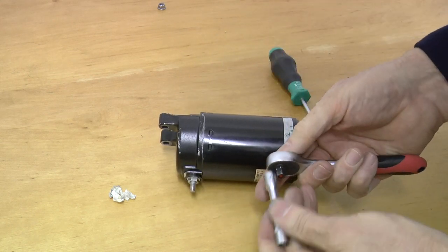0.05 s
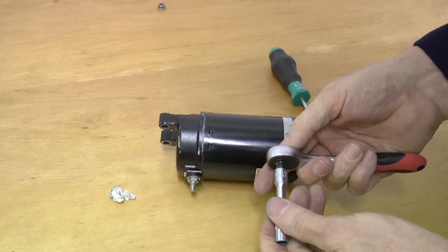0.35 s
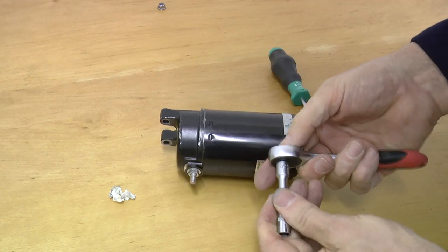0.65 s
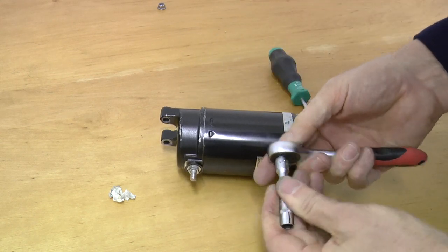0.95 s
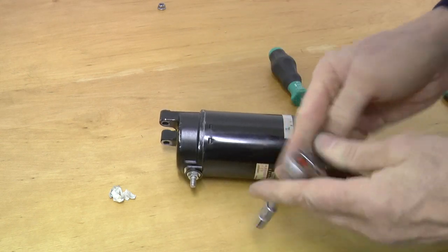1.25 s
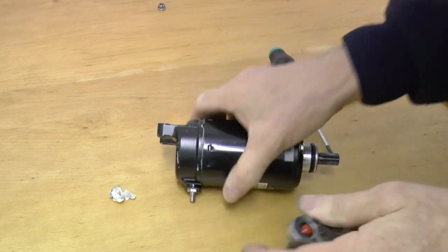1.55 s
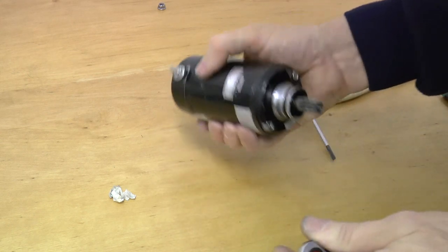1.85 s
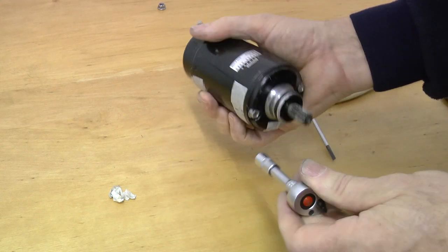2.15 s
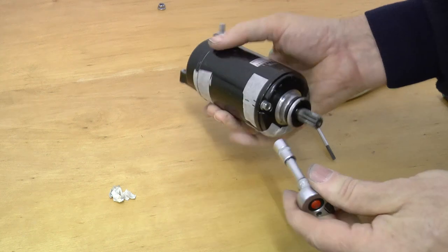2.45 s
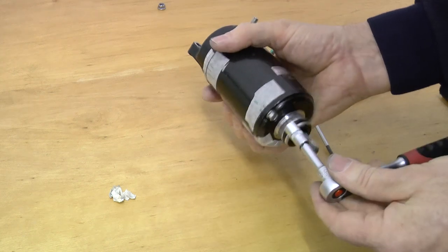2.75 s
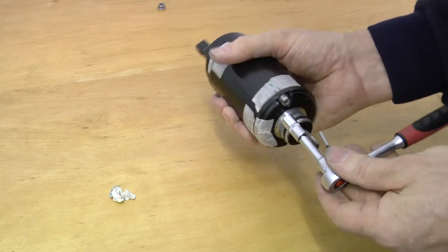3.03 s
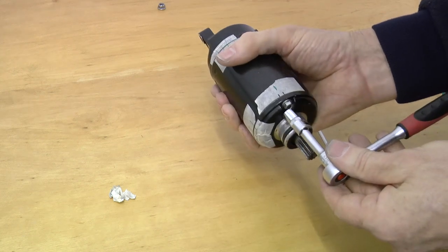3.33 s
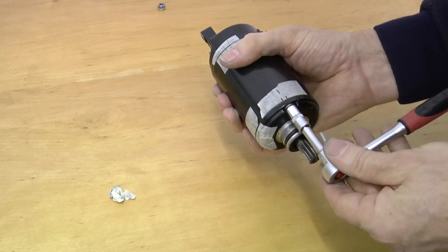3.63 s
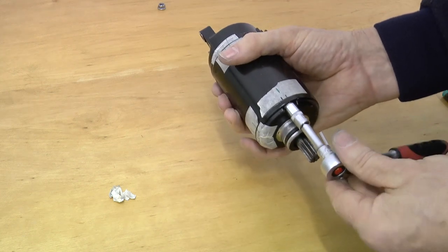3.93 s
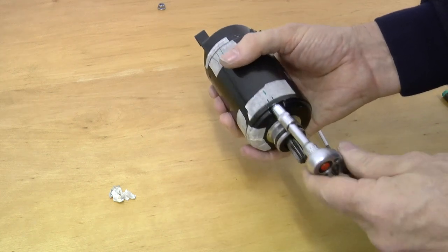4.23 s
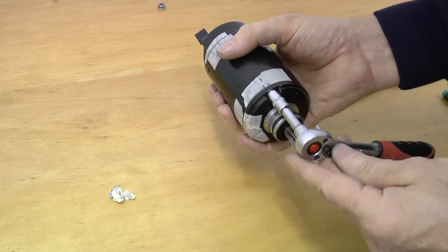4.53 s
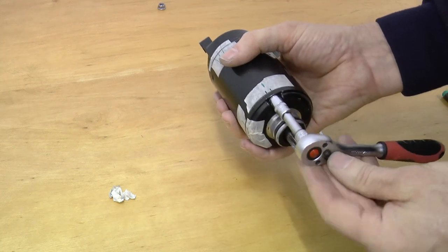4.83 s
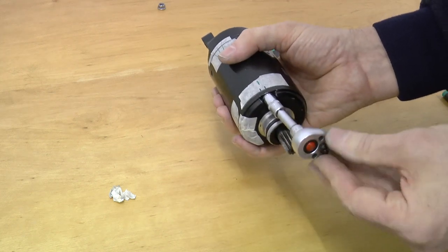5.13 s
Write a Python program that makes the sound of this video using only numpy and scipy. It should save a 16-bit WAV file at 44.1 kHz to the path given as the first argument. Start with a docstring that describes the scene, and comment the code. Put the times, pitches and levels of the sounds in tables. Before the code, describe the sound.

A steel socket is pushed onto a small ratchet with a scatter of sharp, hand-damped clicks. Fingers rub faintly over metal, and a heavy motor rocks on a wooden bench in a quick cluster of dull thuds. The socket taps onto a bolt, then the ratchet ticks through two short back-swings. Everything is close and nearly centred, in a small, slightly live workshop with soft air and a faint electrical whine.

```python
"""A steel socket is pushed onto a small ratchet and set on a bolt of a starter motor; the pawl then
clicks through two short back-swings. Each contact is a tiny crack with a hand-damped ring.
Before the socket meets the bolt, the motor is lifted and rocks on the wooden bench with dull thuds.
Fingers rub over the metal. Close and almost centred, in a small live workshop
with soft air and a faint electrical whine."""
import sys
import numpy as np
from scipy import signal
from scipy.fft import rfft, irfft
from scipy.io import wavfile
from scipy.ndimage import uniform_filter1d

SR = 44100
rng = np.random.default_rng(int(sys.argv[2]) if len(sys.argv) > 2 else 0)


def store_pcm(level_fs):
    """Save levels as 16-bit WAV."""
    pcm = np.round(np.clip(level_fs, -1, 1) * 32767).astype(np.int16)
    wavfile.write(sys.argv[1], SR, np.atleast_2d(pcm).T)


N = 232829
TIME = np.arange(N) / SR

# edges of the four bands that colour a steel crack: f/Hz
CRACK_BAND_EDGES = [1500, 2500, 5500, 10000, 16500]
# steel parts knocking together: t/s, then relative level/dB in each crack band, low to high
SOCKET_KNOCKS = [(0.0163, -43, -30.5, -29.5, -51), (0.0625, -44.5, -58, -45, -54),
                 (0.2359, -44.5, -35.5, -43.5, -57), (0.2762, -70, -59, -68, -78),
                 (0.295, -52, -60, -68, -76), (0.3105, -51.5, -60, -69, -81), (0.366, -61, -50, -72, -88),
                 (0.3712, -46, -48, -62, -74), (0.3782, -51, -38, -55, -47),
                 (0.3804, -49, -40.5, -38.5, -42.5), (0.6662, -47, -51, -45.5, -46),
                 (0.6726, -49, -33, -42, -43), (0.6752, -44, -32, -30.5, -28.5),
                 (0.6785, -31, -34, -29, -33), (0.6795, -42.5, -38, -31, -35),
                 (0.9538, -71, -51.5, -60, -79), (0.9928, -62, -60, -63, -69), (1.2205, -62, -49, -52, -71),
                 (1.3093, -61, -51, -62.5, -70), (1.3185, -58.5, -66, -61, -75),
                 (1.6935, -58, -47.5, -53.5, -72), (2.021, -64, -63, -66, -81), (2.163, -71, -58, -64, -80),
                 (3.2208, -50, -38.5, -46, -63), (3.3148, -57, -58.5, -76, -80),
                 (3.3292, -69, -71, -77, -80), (3.5413, -49, -47.5, -66, -75), (3.552, -63, -62, -68, -85),
                 (3.5662, -60, -41, -45, -65), (3.5765, -48, -50, -57, -74), (3.5855, -64, -56, -59, -65),
                 (4.4955, -65, -68, -85, -93), (4.5405, -70, -63.5, -79, -94),
                 (4.6172, -80, -63.5, -79, -91)]
# hand-damped ring of socket and extension: f/Hz, width/Hz, lift/dB
SOCKET_RING = [(2020, 222, 9), (2660, 34, 3.5), (3100, 260, 2.5), (4396, 86, 8.5), (5710, 106, -2.5),
               (7340, 176, 10), (8120, 49.3, 8.5), (9200, 55, -7), (10500, 67, 6), (12400, 89, 2)]
# the pawl dropping off a tooth: t/s, then relative level/dB in each crack band, low to high
PAWL_CLICKS = [(3.84, -47, -40.5, -31.5, -40), (3.8702, -67, -39, -32, -37), (3.8885, -54.5, -45, -37, -42),
               (3.9066, -55, -38.5, -33.5, -38), (3.9372, -48, -40.5, -35.5, -44),
               (4.0884, -51.5, -39, -33.5, -41), (4.1234, -66, -45, -33.5, -42),
               (4.1452, -49, -41.5, -29.5, -41), (4.1478, -51, -53.5, -35.5, -42),
               (4.1874, -50, -36, -34, -40.5)]
# ring of the ratchet head: f/Hz, width/Hz, lift/dB
RATCHET_RING = [(1990, 86, 17.5), (2890, 300, -3.5), (4964, 107, 11.5), (5690, 110, 4), (6100, 48, 1),
                (6440, 94, 5.5), (7510, 74, 16), (7900, 40, 8), (9040, 50, 6), (9980, 55, 2),
                (11320, 130, 8)]
# the motor rocking on the bench: t/s, relative level/dB, contact time/ms
MOTOR_BUMPS = [(1.5797, -39.5, 0.44), (1.588, -50, 3.5), (1.5988, -36.5, 1.36), (1.6107, -29.5, 0.71),
               (1.6236, -26, 1.26), (1.6324, -26, 2.76), (1.6383, -41.5, 0.67), (1.671, -47, 1.1),
               (1.689, -43, 0.73)]
# ring of bench top and motor housing: f/Hz, relative level/dB, t60/s
BENCH_RING = [(140.2, -10.5, 0.23), (178.8, -9.5, 0.38), (200.5, -12.5, 0.51), (279.6, -0.5, 0.079),
              (342.3, -8, 0.3), (396.5, -3, 0.16), (528, -18, 0.23), (581, -7.5, 0.15), (717, -8, 0.06),
              (770, -13, 0.096), (1149, -8.5, 0.032), (2960, 2.5, 0.042)]
# fingers sliding over metal, one envelope per gesture: t/s, relative level/dB
RUB_ENVELOPES = [
    [(1.05, -82), (1.1, -83), (1.14, -72.5), (1.2, -77), (1.22, -63), (1.24, -70), (1.29, -74), (1.32, -65),
     (1.43, -72.5), (1.62, -59), (1.68, -75), (1.7, -67), (1.73, -66.5), (1.86, -74), (1.99, -75),
     (2.03, -72.5), (2.12, -78), (2.16, -72.5), (2.31, -83.5), (2.38, -67.5), (2.44, -89), (2.51, -73.5),
     (2.55, -89), (2.67, -81), (2.7, -71.5), (2.8, -74), (2.83, -69), (3.02, -104), (3.18, -77)],
    [(4.42, -96), (4.532, -97), (4.544, -79), (4.6, -91), (4.622, -82), (4.672, -94.5), (4.764, -98),
     (4.772, -81), (4.814, -99), (4.886, -77), (5.168, -106), (5.202, -76.5), (5.214, -102), (5.28, -98)],
]
# tone of the rubbing: f/Hz, relative level/dB
RUB_SPECTRUM = [(1200, -7), (2000, 11.5), (3000, 2.5), (5000, 0), (7500, -6), (11000, -9), (16000, -21)]
# early reflections off the bench and near things: t/s, relative level/dB
NEAR_ECHOES = [(.0029, -8), (.0063, -19), (.0077, -11), (.0103, -22), (0.0168, -14)]
# workshop decay: f/Hz, t60/s
WORKSHOP_DECAY = [(150, 0.58), (1000, 0.43), (2000, 0.38), (4500, 0.42), (7500, 0.23), (11000, 0.32),
                  (16000, 0.18)]
# tone of the room air and hiss: f/Hz, relative level/dB
AIR_SPECTRUM = [(20, -8), (60, -5.5), (110, 0.5), (230, 1), (420, 0.5), (500, -7.5), (720, -9), (950, -17),
                (1400, -13.5), (1750, -4), (2200, -13.5), (3200, -9), (4000, -20), (16000, -24.5)]
# stereo image of the air: f/Hz, left-right correlation (0 wide, 1 mono)
AIR_CORRELATION = [(60, 0.4), (200, 0.44), (640, 0.36), (1500, 0.9), (3100, 0.97), (6800, 0.93), (15000, 0)]
# electrical hum and whine: f/Hz, relative level/dB
WHINE_TONES = [(102.3, -82), (667.5, -88.5), (802.1, -78), (1200, -79.5), (1270, -90.5), (1470, -91),
               (1776, -79), (2600, -76.5)]


def steel_clicks(contacts, modes, crack_s, body_db):
    """Each contact is a short crack, coloured by where it lands, that sets the steel ringing."""
    t, cracks = np.arange(1024) / SR, np.zeros(N)
    envelope = (1 - np.exp(-t / 0.00016)) * np.exp(-t / crack_s)
    for start_s, *levels_db in contacts:
        crack = rng.standard_normal(len(t)) * envelope
        for db, low, high in zip(levels_db, CRACK_BAND_EDGES, CRACK_BAND_EDGES[1:]):
            add(cracks, start_s, from_db(db) * unit_rms(band(crack, low, high)))
        # the whole tool recoils in the hand with a faint low knock
        recoil = unit_rms(band(crack, 150, 530, order=2))
        add(cracks, start_s, from_db(levels_db[0] + body_db) * recoil)
    ring = sum((from_db(lift) - 1) * resonance(cracks, hz, width) for hz, width, lift in modes)
    return cracks + ring


def motor_on_bench():
    """The heavy motor pushes the board; the longer a contact lasts, the duller its thud."""
    t, force = np.arange(1024) / SR, np.zeros(N)
    for start_s, db, contact_ms in MOTOR_BUMPS:
        rise_s = contact_ms / 1000 / (2 * np.pi)
        push = t * np.exp(-t / rise_s)
        add(force, start_s, from_db(db) * push / push.sum())
    t = TIME[:SR]
    ring = sum(from_db(db - 60 * t / t60) * np.sin(2 * np.pi * hz * t) for hz, db, t60 in BENCH_RING)
    return signal.fftconvolve(force, ring)[:N]


def finger_rub(grain_db):
    """Skin catches and slips on the metal in dense tiny grains."""
    grains = rng.standard_normal(N)
    grains *= from_db(grain_db * np.minimum(rng.exponential(1, N), 5))
    pressure = np.zeros(N)
    for gesture in RUB_ENVELOPES:
        times, levels_db = np.transpose(gesture)
        pressure += np.interp(TIME, times, from_db(levels_db), left=0, right=0)
    return pressure * coloured(grains, RUB_SPECTRUM)


def workshop(x, tail_db, echo_gain_db, correlation, build_s):
    """Direct sound, a few near echoes, then a diffuse tail whose treble dies first."""
    t = TIME[:int(0.7 * SR)]
    edges_hz = np.geomspace(70, 18000, 13)
    noise, tail = rng.standard_normal((2, 2, len(t))), 0
    for k, (low, high) in enumerate(zip(edges_hz, edges_hz[1:])):
        t60 = at_hz(WORKSHOP_DECAY, np.sqrt(low * high))
        tail += band(noise[k % 2], low, high, order=2) * from_db(-60 * t / t60)
    bloom = 1 - np.exp(-(t / build_s) ** 2)
    tail = stereo(*(tail * bloom), correlation)
    response = from_db(tail_db) * unit_rms(tail) / np.sqrt(len(t))
    response[:, 0] += 1   # direct sound
    for delay_s, db in NEAR_ECHOES:
        response[:, int(delay_s * SR)] += from_db(db + echo_gain_db)
    return signal.fftconvolve(x[None], response, axes=1)[:, :N]


def electrical_whine(waver_hz):
    """A few thin electrical tones, each wavering slightly in pitch."""
    whine = np.zeros(N)
    for hz, db in WHINE_TONES:
        waver = waver_hz * unit_rms(uniform_filter1d(rng.standard_normal(N), size=2000))
        whine += from_db(db) * np.sin(2 * np.pi * np.cumsum(hz + waver) / SR)
    return whine


def room_air():
    """A steady bed of air and hiss, wide in the lows and at the very top, narrow in between."""
    mid, side = rfft(rng.standard_normal((2, N)))
    correlation = at_hz(AIR_CORRELATION, np.fft.rfftfreq(N, 1 / SR))
    return coloured(irfft(stereo(mid, side, correlation), N), AIR_SPECTRUM)


def from_db(db):
    """Decibels to gain."""
    return 10 ** (np.asarray(db) / 20)


def unit_rms(x):
    """Scale to unit rms."""
    return x / np.sqrt(np.mean(x ** 2) + 1e-20)


def at_hz(points, hz):
    """Read a table on a log-frequency axis."""
    f, value = np.transpose(points)
    return np.interp(np.log(np.maximum(hz, 1)), np.log(f), value)


def band(x, low, high, order=3):
    """Band-pass between two edges in Hz."""
    return signal.sosfilt(signal.butter(order, [low, high], "band", fs=SR, output="sos"), x)


def coloured(x, spectrum):
    """EQ noise with a spectrum, at unit rms."""
    gain = from_db(at_hz(spectrum, np.fft.rfftfreq(N, 1 / SR)))
    return unit_rms(irfft(rfft(x) * gain, N))


def stereo(mid, side, correlation):
    """Mid and side to left and right; more correlation, narrower image."""
    return np.sqrt(1 + correlation) * mid + np.sqrt(1 - correlation) * side * np.array([[1], [-1]])


def add(track, start_s, sound):
    """Mix a sound in at its cue."""
    start = int(start_s * SR)
    track[start:start + len(sound)] += sound[:N - start]


def resonance(x, hz, width):
    """Two-pole resonance with unity gain at its peak."""
    r = np.exp(-np.pi * width / SR)
    gain = (1 - r * r) / 2
    feedback = [1, -2 * r * np.cos(2 * np.pi * hz / SR), r * r]
    return signal.lfilter([gain, 0, -gain], feedback, x + 1e-18)


def scene():
    """Tools and hands a touch right of centre, the drier bench thuds centred, room tone underneath."""
    socket = steel_clicks(SOCKET_KNOCKS, SOCKET_RING, crack_s=0.00096, body_db=-18)
    ratchet = steel_clicks(PAWL_CLICKS, RATCHET_RING, crack_s=0.00087, body_db=-14)
    handling = from_db(-11.5) * (socket + ratchet) + from_db(1.5) * finger_rub(grain_db=4.5)
    tools = workshop(handling, tail_db=-3, echo_gain_db=3, correlation=0.89, build_s=0.0063)
    thuds = workshop(motor_on_bench(), tail_db=-8.5, echo_gain_db=-17.5, correlation=0.87, build_s=0.014)
    room_tone = from_db(-66.5) * room_air() + from_db(2.5) * electrical_whine(waver_hz=2.45)
    pan = from_db([[-0.3], [0.3]])
    return tools * pan + thuds + room_tone


def record(dry):
    """A steep high cut at 16.1 kHz."""
    return signal.sosfilt(signal.ellip(10, 0.1, 80, 16100, fs=SR, output="sos"), dry)


dry = scene()
out = record(dry)
store_pcm(out)
```